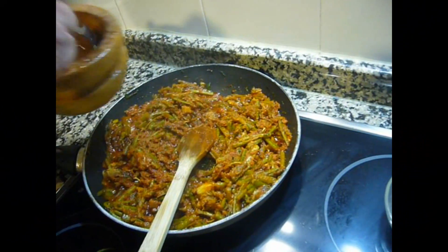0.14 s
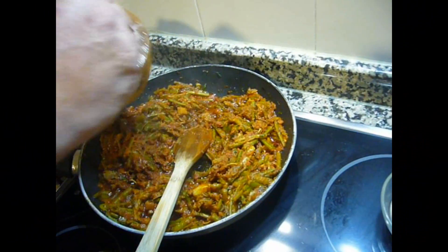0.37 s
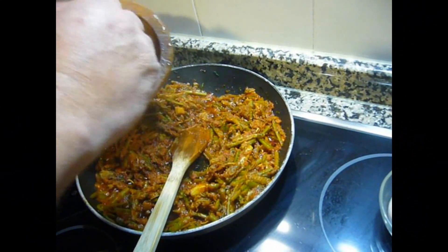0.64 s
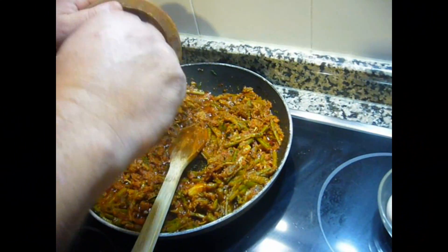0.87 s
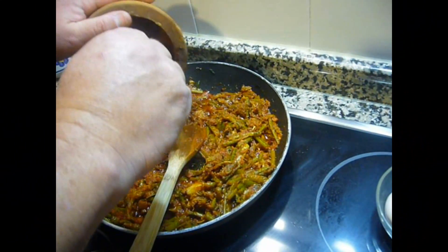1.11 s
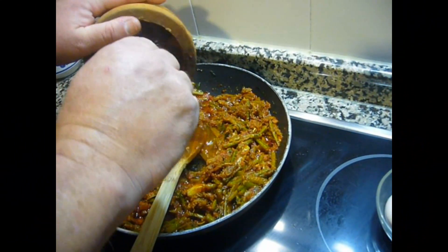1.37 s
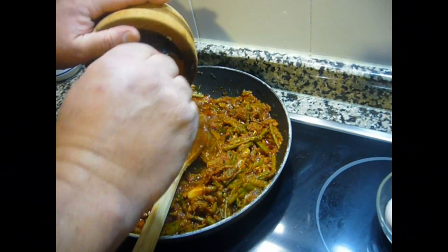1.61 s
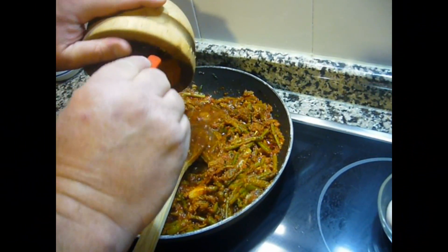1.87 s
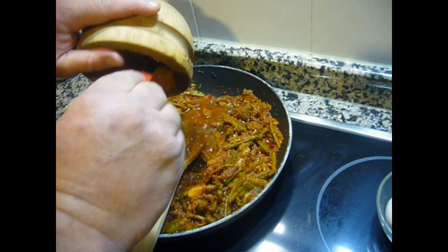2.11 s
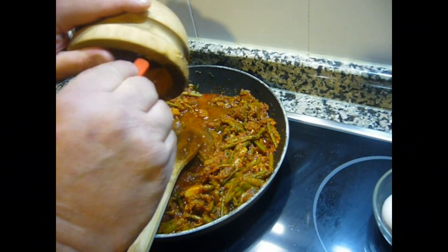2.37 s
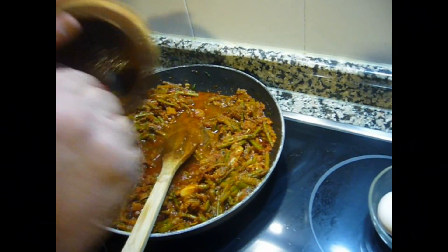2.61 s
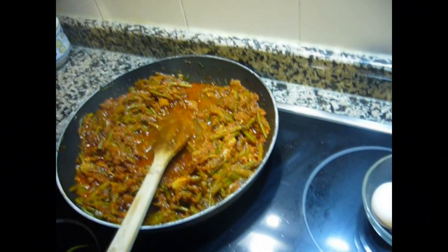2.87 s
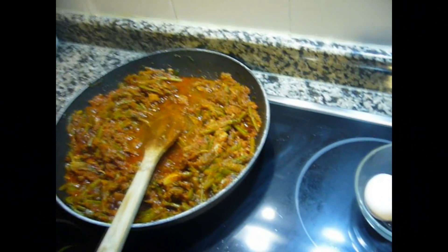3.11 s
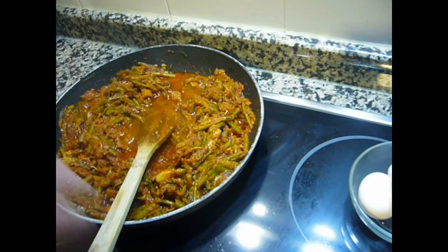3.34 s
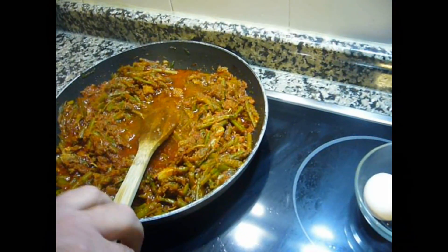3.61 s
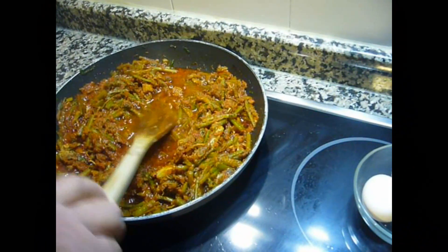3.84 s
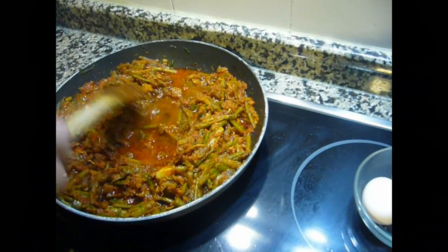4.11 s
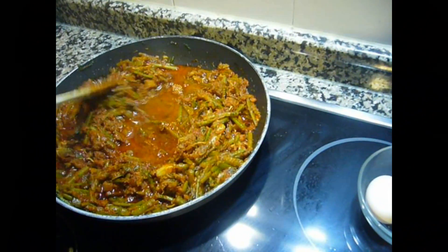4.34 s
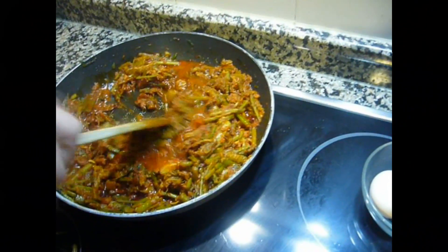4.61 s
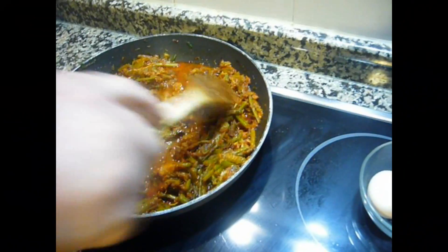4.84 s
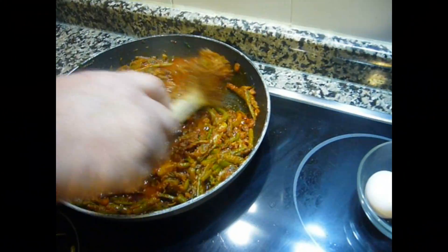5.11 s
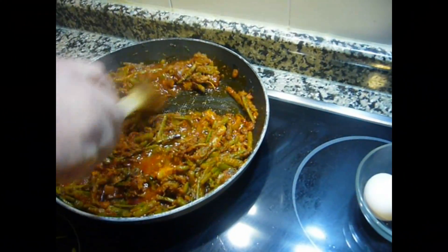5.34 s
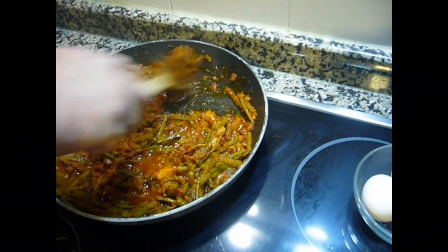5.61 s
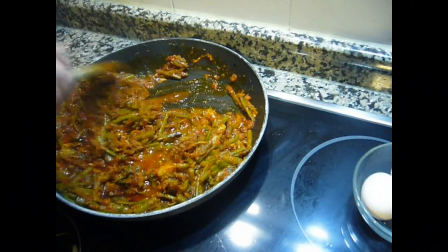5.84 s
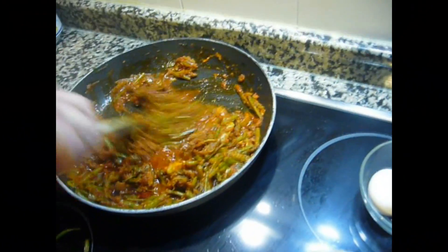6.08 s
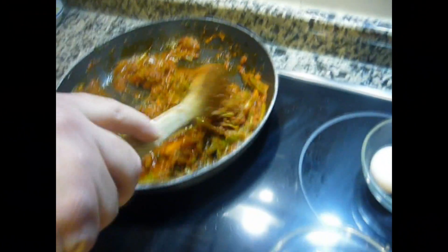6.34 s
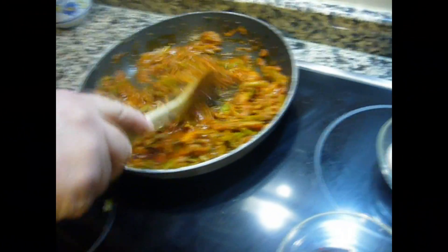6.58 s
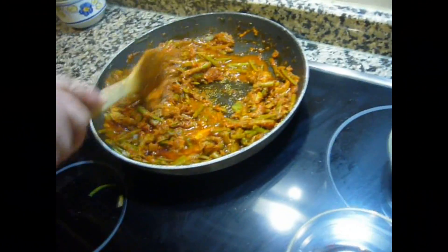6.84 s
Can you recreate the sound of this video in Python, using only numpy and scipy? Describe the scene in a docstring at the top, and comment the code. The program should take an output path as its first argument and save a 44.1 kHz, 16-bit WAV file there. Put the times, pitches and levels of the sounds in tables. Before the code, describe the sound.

In a small tiled kitchen, a thick stew sizzles and bubbles under a low fan hum. Close by, a hollow wooden mortar is scraped, tapped and wiped out over the pan, with a few woody knocks and tiny spits. It lands hard on the counter with a loud double clunk. Then a wooden spoon pushes wetly through the food, rubbing and bumping the pan as hot metal hisses. Close small camera microphone, dull treble.

```python
"""A thick stew simmers in a frying pan under a kitchen fan: shaped noise, narrow hum and small bursts, throughout.
At first a hollow wooden mortar is scraped, tapped and wiped out over it, knocked and set down hard on the counter:
rough noise and short contacts excite its resonances, among ticks and spits. Then a wooden spoon stirs, rubs and
bumps the pan, baring hot metal that hisses. A small camera close by limits loud hits and samples slowly, so the
treble is a faint mirror of the middle."""
import sys
import numpy as np
from scipy import signal
from scipy.fft import rfft, irfft, next_fast_len
from scipy.io import wavfile
from scipy.ndimage import map_coordinates

SR = 44100
rng = np.random.default_rng(int(sys.argv[2]) if len(sys.argv) > 2 else 0)


def linear_from_db(decibels):
    """Turn decibels (scalar or array-like) into linear amplitude factors; 0 gives 1."""
    return 10 ** (np.asarray(decibels, float) / 20)


def master_out(mix):
    """Clip the mix to full scale and print it as 16-bit PCM to the path in sys.argv[1]."""
    frames = np.transpose(np.atleast_2d(mix))
    ceiling = np.clip(frames, -1, 1)
    pcm = np.round(ceiling * 32767).astype(np.int16)
    wavfile.write(sys.argv[1], SR, pcm)


N = 307043

# Resonances of the mortar and the counter under it.
# Each row: frequency in Hz, nominal width in Hz, relative level in dB.
MORTAR_MODES = [(97.7, 8.1, -8.5), (224, 28, -6.5), (320, 39, -4.5), (447, 93, -5), (567, 86, 0),
                (711, 81, 2.5), (887, 84, 2.5), (1000, 128, 1.5), (1270, 120, -7), (1520, 140, -13.5),
                (1770, 56, -15.5), (2097, 61, -25.5), (2403, 87, -16), (2680, 48, -13.5),
                (2963, 190, -18.5), (3160, 390, -35)]
# Resonances of the filled pan. Each row: frequency in Hz, nominal width in Hz, relative level in dB.
PAN_MODES = [(189, 95, 3), (318, 95, 11.5), (400, 59, -4.5), (458, 47, -0.5), (648, 44, -12.5),
             (700, 14, -3), (980, 90, -4), (1200, 150, -9), (1650, 250, -28)]


def unit(x):
    """Normalization by energy: scales a signal to rms 1."""
    return x / np.sqrt(np.mean(x ** 2) + 1e-20)


def along(points, hz):
    """Interpolation on a logarithmic frequency axis between (Hz, value) points."""
    f, v = np.transpose(points)
    return np.interp(np.log(hz + 1), np.log(f + 1), v)


def curves(rows):
    """Linear interpolation in time: one value per sample for each column after the time."""
    s, *cols = np.transpose(rows)
    return [np.interp(np.arange(N) / SR, s, c) for c in cols]


def wobble(rate):
    """Slow random modulation: a smooth curve through random knots, rate of them per second."""
    knots = rng.standard_normal(int(N * rate / SR) + 4)
    return map_coordinates(knots, [np.arange(N) * rate / SR])


def filtered(x, response):
    """Linear filtering: the spectrum of x times a complex response of frequency."""
    m = next_fast_len(x.shape[-1] + 8192)  # room for the ringing to end
    return irfft(rfft(x, m) * response(np.fft.rfftfreq(m, 1 / SR)), m)[..., :x.shape[-1]]


def body(modes, tilt_db=lambda hz: 0):
    """Modal superposition: causal second-order resonances (Hz, width Hz, dB) with alternating signs."""
    def response(f):
        total = 0
        for k, (c, w, db) in enumerate(modes):
            resonance = 1j * f * w / (c * c - f * f + 1j * f * w)
            total = total + (-1) ** k * linear_from_db(db + tilt_db(c)) * resonance
        return total
    return response


def gritty(spike_db, rate):
    """Random amplitude modulation: noise of rms 1 whose level jumps about, as uneven contact does."""
    return unit(rng.standard_normal(N) * linear_from_db(spike_db * wobble(rate)))


def add(track, s, sound, db):
    """Superposition: lays a sound on the track from s seconds, with the given peak in dB."""
    start = round(s * SR)
    track[start:start + len(sound)] += (linear_from_db(db) * sound / np.abs(sound).max())[:N - start]


def contact(t60, rattle):
    """Impulsive excitation: one push, then the chatter of the two surfaces dying exponentially."""
    t = np.arange(SR // 4) / SR
    push = rattle * rng.standard_normal(len(t)) * linear_from_db(-60 * t / max(t60, .004))
    push[0] = 1
    return push


def strokes(rows, rise, fall):
    """Exponential envelopes: each row swells to its levels at its start, holds for its length and fades.
    Rise and fall are in dB per second; one gain curve per level column."""
    t = np.arange(N) / SR
    s, length, *levels = np.transpose(rows)[..., None]
    shape_db = -rise * np.maximum(s - t, 0) - fall * np.maximum(t - s - length, 0)
    return [linear_from_db(shape_db + db).max(axis=0) for db in levels]


def favoured(grit, modes, centre_hz, spread, base):
    """Selective excitation: rubbing noise rings modes, those near a moving centre strongest."""
    shares = [base + np.exp(-(np.log(c / centre_hz) / spread) ** 2) for c, _ in modes]
    rings = [unit(filtered(grit, body([(c, w, 0)]))) for c, w in modes]
    total = sum((-1) ** k * share * ring for k, (share, ring) in enumerate(zip(shares, rings)))
    return total / np.sqrt(sum(share * share for share in shares))


def fan():
    """Turbulence and rotation: a broad rush of air with narrow unsteady tones."""
    # Spectrum of the fan and room air. Each row: frequency in Hz, relative density in dB per Hz.
    air_spectrum = [(15, -33), (25, -15.5), (32, -20.5), (65, -35.5), (92, -17.5), (140, -19), (195, -12),
                    (276, -10.5), (338, -9.5), (370, -6.5), (479, -10.5), (586, -8.5), (996, -13),
                    (1260, -26), (2000, -11.5), (2600, -50), (4400, -120)]
    # The unsteady tones. Each row: frequency in Hz, half width at half amplitude in Hz, rms level in dB.
    hum = [(101.8, 17, -54.5), (206.4, 4.7, -58.5), (319, 14, -56.5), (435.2, 3.3, -53.5)]
    air = unit(filtered(gritty(spike_db=1.6, rate=5.4), lambda hz: linear_from_db(along(air_spectrum, hz))))
    out = linear_from_db(-43) * air
    for hz, width, db in hum:
        tone = filtered(rng.standard_normal(N), lambda f: 1 / (1 + ((f - hz) / width) ** 2))
        out += linear_from_db(db) * unit(tone)
    return out


def simmer():
    """Bubble acoustics: steam hiss with many small bursts; larger bubbles ring near 1 kHz in spells."""
    # Course of the simmer. Each row: time in seconds, sizzle level in dB, mean bubbling level in dB.
    course = [(0.0, -41, -42), (1.0, -43, -55.5), (2.0, -39, -63), (2.6, -41.5, -57), (2.8, -39, -46),
              (4.0, -40, -51.5), (5.2, -42, -47), (6.0, -41, -42), (6.5, -44, -51), (6.96, -41.5, -44)]
    # Spectrum of the sizzle. Each row: frequency in Hz, relative density in dB per Hz.
    sizzle_spectrum = [(530, -18.5), (900, -1.5), (1140, -5), (1340, -3.5), (1680, -2), (1750, -6.5),
                       (2630, -4.5), (3900, -15.5), (5070, -63), (8580, -120)]
    sizzle_db, bubble_db = curves(course)
    moments = rng.random(N) < 500 / SR  # about 500 bursts a second
    bursts = moments * linear_from_db(2.0 * rng.standard_normal(N)) * rng.choice([-1, 1], size=N)
    mix = gritty(spike_db=.4, rate=20) + .45 * unit(bursts)
    sizzle = unit(filtered(mix, lambda hz: linear_from_db(along(sizzle_spectrum, hz))))
    bubbles = unit(filtered(gritty(spike_db=2.5, rate=36), body([(1006, 84, 0)])))
    return linear_from_db(sizzle_db) * sizzle + linear_from_db(bubble_db + 1.5 * wobble(4)) * bubbles


def rasp():
    """Friction-driven resonance: strokes ring the wood's low modes together, high ones near a centre."""
    # Rubbing strokes on the mortar. Each row: start in seconds, length in seconds, body level in dB,
    # rasp level in dB, centre of the rasp in Hz.
    rubs = [(0.019, 0.043, -32, -32, 2280), (0.062, 0.076, -33, -30, 1840),
            (0.445, 0.053, -56, -38.5, 2550), (0.69, 0.041, -39, -50, 1920),
            (2.138, 0.03, -39.5, -38, 1720), (2.223, 0.052, -42, -40, 1700)]
    grit = gritty(spike_db=3, rate=130)
    rub, scratch = strokes([row[:4] for row in rubs], rise=2200, fall=350)
    centre_hz, = curves([(s + edge, c) for s, length, _, _, c in rubs for edge in (0, length)])
    # rubbing evens out the low modes and broadens them; the high ones are narrower
    low_modes = [(c, 1.2 * w, 0.21 * db) for c, w, db in MORTAR_MODES if 150 < c < 1400]
    high_modes = [(c, 0.62 * w) for c, w, _ in MORTAR_MODES if c > 1400]
    low = unit(filtered(grit, body(low_modes)))
    thin = favoured(grit, high_modes, centre_hz, spread=0.094, base=0.57)
    return rub * low + scratch * thin


def taps():
    """Cavity resonance: light taps ring the hollow, with a neighbour resonance below it."""
    # The spatula taps inside the bowl. Each row: start in seconds, peak level in dB, pitch in Hz.
    bowl_taps = [(0.2657, -23, 1454), (0.481, -24.5, 2540), (0.519, -27.5, 1480), (0.8207, -32.5, 1340),
                 (1.2662, -25, 1490), (1.3014, -32, 1520), (1.717, -30.5, 1520), (1.946, -23.5, 1450),
                 (1.9934, -29, 1520), (2.442, -27, 1490), (2.652, -32.5, 1480)]
    out = np.zeros(N)
    for s, db, hz in bowl_taps:
        hollow = body([(hz, 90, 0), (.89 * hz, 70, -5)])
        add(out, s, filtered(contact(t60=0.093, rattle=0.045), hollow), db)
    return out


def mortar():
    """Modal excitation by impact: a blow rings the wood over a short broad thud; its place picks the modes."""
    # Blows on the mortar. Each row: start in seconds, peak level in dB, tilt of the low modes in dB,
    # tilt of the high modes in dB, pitch of the contact in Hz.
    knocks = [(0.2973, -14.5, 4.5, 8, 620), (0.307, -31, -5, 3, 950), (0.3605, -11, -4, -8, 1040),
              (0.377, -21.5, 3, 12, 1000), (2.549, -11.5, -8, 10.5, 710), (2.559, -16.5, 8, 24, 740),
              (2.763, -28, -3, 8, 720), (2.856, -22, 1, -11, 760), (3.149, -23.5, 3, 10.5, 870),
              (3.5605, 2, 0, -5.5, 914), (3.583, -5.5, 1.5, -8.5, 725), (3.62, -8.5, 9, -9, 980),
              (3.751, -13, 10, -7, 900), (3.7654, -3, 9, -15, 892), (3.777, -8, 13, -22, 593),
              (3.789, -17.5, 23, -13, 530)]
    out = np.zeros(N)
    for s, db, low_db, high_db, hz in knocks:
        t60 = 0.22 if 3.5 < s < 3.6 else 0.064  # seconds; longer while the mortar rocks on the counter

        def tilt(c):
            slope = along([(330, low_db), (600, 0), (1250, 0), (1800, high_db)], c)
            return slope + 4 * np.exp(-(np.log(c / hz) / 0.11) ** 2)
        ring = filtered(contact(t60, rattle=0.1), body(MORTAR_MODES, tilt))
        thud = filtered(contact(t60, rattle=0.016), lambda f: body([(hz, 1300, -3)])(f) ** 2)
        blow = filtered(ring + thud, lambda f: 1 / (1 + 1j * f / 2500))  # wood is a soft striker
        add(out, s, blow, db)
    return out


def wipes():
    """Friction-driven cavity resonance: the spatula wipes the bowl and its hollow hums."""
    # Wipes of the bowl. Each row: start in seconds, length in seconds, level in dB.
    bowl_wipes = [(0.826, 0.067, -44.5), (0.93, .04, -48), (1.09, 0.018, -48), (1.28, 0.066, -44),
                  (1.5, 0.088, -47.5), (1.73, 0.12, -46), (1.96, 0.091, -42.5), (2.23, .03, -41),
                  (2.42, .07, -42.5), (2.65, .03, -46)]
    hum = unit(filtered(gritty(spike_db=2.5, rate=90), body([(1317, 39, -2), (1480, 19, 0)])))
    return strokes(bowl_wipes, rise=340, fall=220)[0] * hum


def ticks():
    """Heavily damped resonance: ticks and spits are short contacts through wide modes."""
    # The loudest ticks and spits. Each row: start in seconds, peak level in dB, pitch in Hz.
    loud_ticks = [(1.3004, -27.5, 3070), (1.331, -21, 2900), (1.3516, -30, 3680), (1.608, -28, 2580),
                  (1.7154, -26, 3000), (1.754, -32.5, 2930), (1.8295, -28, 3030), (1.8848, -29, 2770),
                  (2.065, -30, 2570), (2.1328, -19, 1680), (2.193, -28.5, 2680), (2.8596, -35.5, 2680),
                  (4.5728, -27, 2630)]
    out = np.zeros(N)
    # 14 fainter spits at chance moments, peaks -38.5 to -34.5 dB, pitches within a tenth of 2850 Hz
    chance = [(u * (N - 1) / SR, -38.5 + 4 * v, 2850 * (.9 + .2 * w)) for u, v, w in rng.random((14, 3))]
    for s, db, hz in loud_ticks + chance:
        ring = filtered(contact(t60=.016, rattle=0.6), body([(hz, 310, 0), (3600, 500, -8)]))
        add(out, s, filtered(ring, body([(hz, 1500, 0)])), db)
    return out


def stir():
    """Friction against a damped plate: the spoon drags over the pan bottom and the sauce squelches."""
    # The spoon pushes along the pan. Each row: start in seconds, length in seconds, rumble level in dB,
    # drag level in dB, squelch level in dB.
    pushes = [(4.45, 0.13, -60, -49, -41.5), (4.57, 0.088, -48, -54, -44), (4.72, 0.13, -63, -58, -43),
              (4.9, 0.12, -69, -55, -41), (5.06, 0.13, -52.5, -41, -40.5), (5.25, .08, -42.5, -38, -37),
              (5.685, .04, -41.5, -40, -43), (5.735, 0.074, -44.5, -39, -41), (6.118, 0.064, -39, -39, -40),
              (6.32, 0.31, -60, -53, -42), (6.662, 0.032, -45, -36, -36)]
    heavy, dragging, squelch = strokes(pushes, rise=430, fall=234)
    grit = gritty(spike_db=2.5, rate=70)
    low_modes = [(c, w, 0) for c, w, _ in PAN_MODES if c < 340]
    middle_modes = [(c, 1.25 * w, 0) for c, w, _ in PAN_MODES if 340 < c < 800]
    rumble = unit(filtered(grit, body(low_modes)))
    drag = unit(filtered(grit, body(middle_modes)))
    wet_modes = [(1000, 120, -0.5), (1225, 92, 1.5), (1620, 340, -4.5)]
    wet = unit(filtered(gritty(spike_db=1.5, rate=66), body(wet_modes)))
    return heavy * rumble + dragging * drag + squelch * wet


def bared_metal():
    """Boiling noise: hot metal laid bare behind the spoon hisses until the sauce runs back."""
    # Hisses of the bared metal. Each row: start in seconds, length in seconds, level in dB.
    bared = [(4.56, 0.051, -46.5), (4.7, 0.085, -39.5), (4.9, 0.19, -45), (5.06, 0.25, -42),
             (5.72, 0.027, -52), (6.27, 0.058, -40.5), (6.35, 0.38, -46.5), (6.74, .03, -48)]
    modes = [(2230, 280, -3.0), (2648, 110, 2.5), (3070, 440, -6)]
    hiss = unit(filtered(gritty(spike_db=2.0, rate=50), body(modes)))
    return strokes(bared, rise=370, fall=140)[0] * hiss


def pan():
    """Damped impact: the spoon's bumps are dull because the food damps the metal."""
    # Bumps of the spoon on the pan. Each row: start in seconds, peak level in dB, tilt of the high modes in dB.
    bumps = [(5.052, -25, -15), (6.003, -12, -2), (6.033, -23, -3), (6.175, -25, 7), (6.66, -22, 15)]
    out = np.zeros(N)
    for s, db, high_db in bumps:
        tilt = lambda c: along([(500, 0.0047), (900, high_db)], c)
        ring = filtered(contact(t60=0.057, rattle=0.087), body(PAN_MODES, tilt))
        # high-pass at 150 Hz, double low-pass at 1300 Hz
        dull = filtered(ring, lambda f: 1j * f / 150 / (1 + 1j * f / 150) / (1 + 1j * f / 1300) ** 2)
        add(out, s, dull, db)
    return out


def kitchen(x):
    """Reverberation: tiles and counter answer with noise tails, each frequency dying at its own speed.
    Every 50 ms of sound gets a fresh random tail, so that no single tail colours the whole scene."""
    # Decay of the room. Each row: frequency in Hz, t60 in seconds.
    decay = [(100, 0.3), (300, 0.39), (1000, 0.33), (3000, 0.24)]
    out = np.zeros(N + 2 * SR)
    hop = SR // 20
    for start in range(0, N, hop):
        hz, t, z = signal.stft(rng.standard_normal(SR // 2), SR, nperseg=256)
        fade = linear_from_db(-60 * t / along(decay, hz)[:, None])
        tail = signal.istft(z * fade, SR, nperseg=256)[1]
        echo = signal.fftconvolve(x[start:start + hop], tail / np.linalg.norm(tail))
        out[start + 130:][:len(echo)] += echo  # the answer comes 3 ms late
    return out[:N]


def limited(x):
    """Soft saturation: a fast limiter turns down by the envelope, then rounds off the peaks."""
    swing = np.abs(signal.hilbert(x, next_fast_len(N), axis=1)[:, :N])
    held = x / (1 + (swing / .85) ** 4) ** (1 / 4)
    return held / (1 + np.abs(held / .5) ** 7) ** (1 / 7)


def slow_sampling(x):
    """Spectral imaging: slow sampling leaves on playback a mirror of the band above half the rate."""
    # What passes of the band and its mirror. Each row: frequency in Hz, gain in dB.
    mirror_gain = [(4000, -2.5), (4400, -10.5), (5000, -20.5), (6000, -38.5), (6500, -46.5), (7100, -60),
                   (7600, -76.5), (8200, -91.5), (8900, -74), (11000, -92)]
    camera_rate = 8000  # Hz
    slow = signal.resample_poly(x, 80, 441, axis=1)
    back = signal.resample_poly(slow, 441, 80, axis=1)[:, :N]
    mirrored = back * (1 + 2 * np.cos(2 * np.pi * camera_rate * np.arange(N) / SR))
    return filtered(mirrored, lambda hz: linear_from_db(along(mirror_gain, hz)))


def scene():
    """Superposition of fields: hits and strokes sound in the room, over fan and simmer."""
    near = rasp() + taps() + mortar() + wipes() + ticks() + stir() + bared_metal() + pan()
    return (near + linear_from_db(-5.5) * kitchen(near) + fan() + simmer())[None]


def low_pass(x):
    """Removes everything above the highest recorded frequency."""
    return signal.sosfilt(signal.butter(12, 10500, fs=SR, output="sos"), x)


def record(dry):
    """Nonlinear and sampled transmission: the camera limits, samples slowly and adds a constant offset."""
    mix = slow_sampling(limited(dry)) - .0814
    return low_pass(mix)


dry = scene()
out = record(dry)
master_out(out)
```